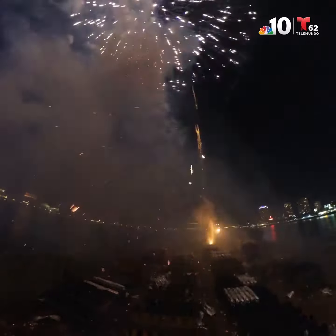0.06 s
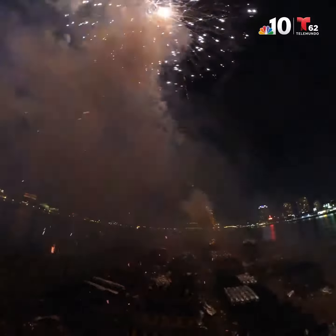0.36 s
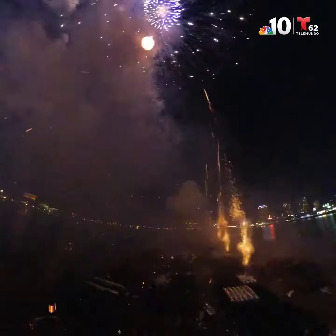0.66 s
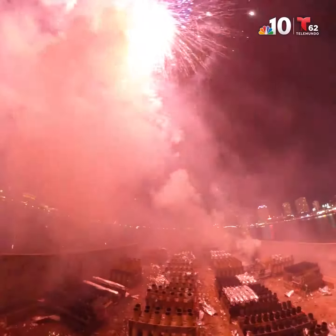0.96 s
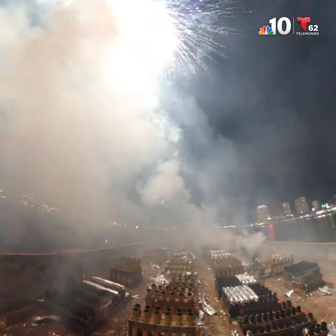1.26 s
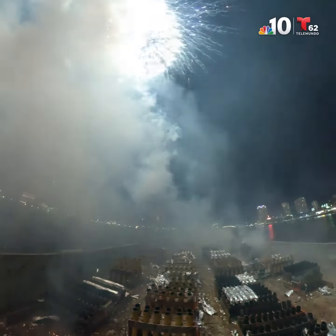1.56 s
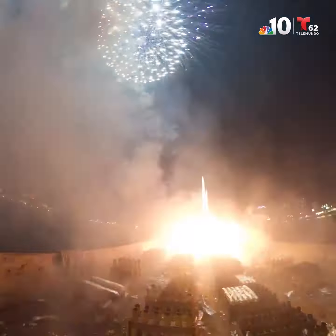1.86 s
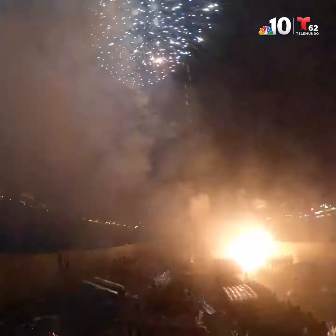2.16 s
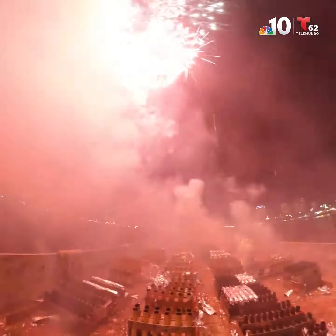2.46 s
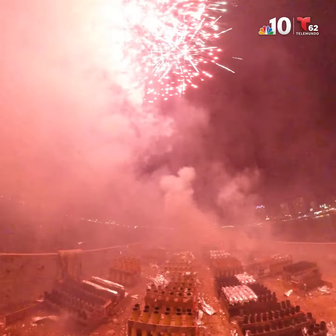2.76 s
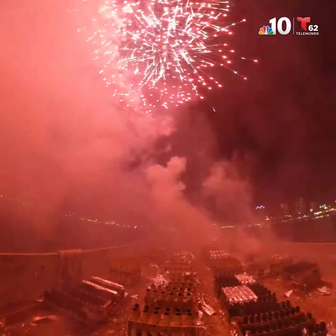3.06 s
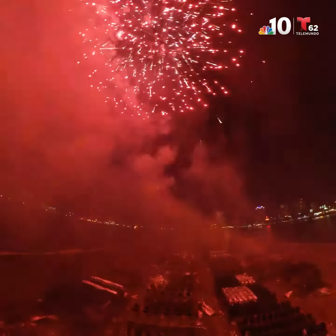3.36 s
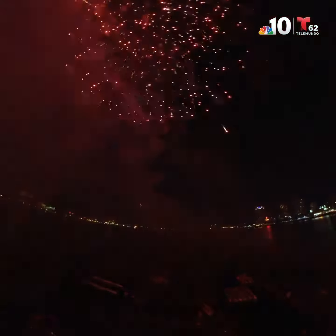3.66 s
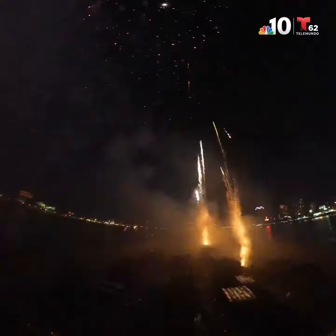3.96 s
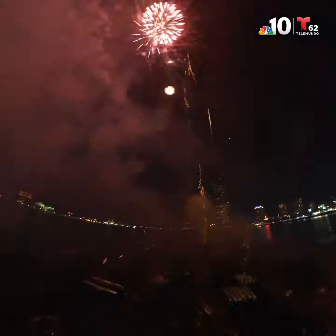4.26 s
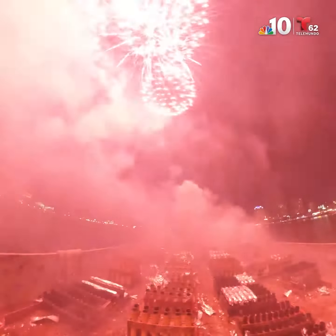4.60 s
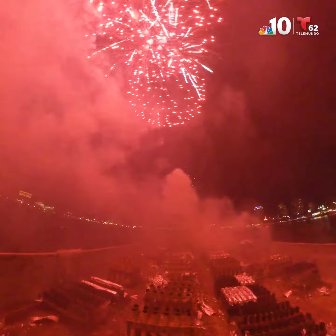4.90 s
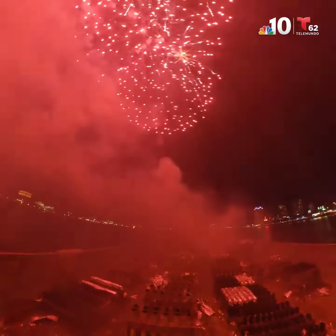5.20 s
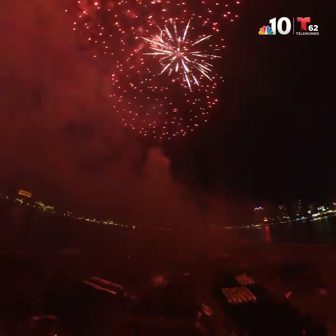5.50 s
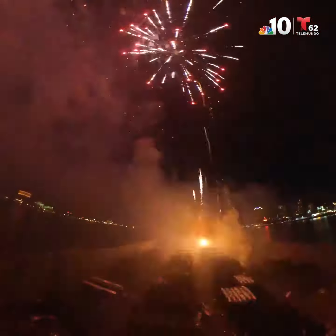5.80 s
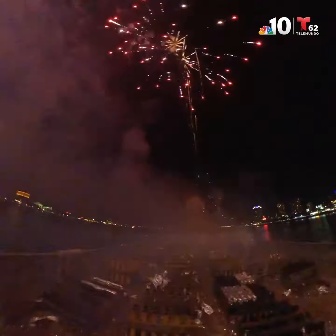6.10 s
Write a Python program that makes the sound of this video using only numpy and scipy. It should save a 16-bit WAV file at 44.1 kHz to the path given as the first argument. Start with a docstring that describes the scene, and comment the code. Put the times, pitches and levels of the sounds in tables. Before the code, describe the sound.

Heard close up from the deck of a barge, fireworks launch with short spitting whooshes, deep thumps and a rattle of tubes. Two launches lead to two sharp cracks overhead. More launches bring a fast string of bangs, then a further round ends in a second quick cluster. Each burst snaps back off the nearby racks and fades over the water, above a low distant rumble and faint sizzling.

```python
"""Firework mortars firing from racks on a barge, heard from the deck.
Each muzzle spits a turbulent jet; the lift charge then sends out a blast wave, the rack booms, a hollow
note sinks and the tube knocks and rings. Shells burst overhead as shocks that reflect off the deck and
scatter among the racks. Reverberation rolls away over the water while burning stars fizz."""
import sys
import numpy as np
from scipy import signal
from scipy.io import wavfile

SR = 44100
rng = np.random.default_rng(int(sys.argv[2]) if len(sys.argv) > 2 else 0)


def transcribe(u):
    """Save the signal u as a 16-bit wav file named by the first command-line argument.

    u: samples, shape (n,) or (channels, n), limited to [-1, 1]; the rate is SR.
    q: integer samples, one column per channel.
    """
    v = np.clip(np.atleast_2d(u).T, -1, 1)
    q = np.round(v * 32767).astype(np.int16)
    wavfile.write(sys.argv[1], SR, q)


N = 270774
TIME = np.arange(N) / SR
STEP = 16
TICKS = TIME[::STEP]   # the slower clock of all power curves
BANDS = np.geomspace(28, 11000, 24)   # centres, f/Hz
CUTOFF_HZ = 10600
TAIL_TOP_HZ = 9900   # upper edge of the booms, scatter and rolling tails

# Mortar launches (levels in all tables are relative): t/s, spit/dB, jet delay/s, jet/dB, jet length/s,
# jet body/dB, recoil/dB, lift delay/s, lift gust/dB, hiss/dB, boom/dB, boom length/s, knock/dB
LAUNCHES = [(0, -17.5, 0.017, -8, 0.028, 1.5, -32.5, 0.087, -24, -18, -20, 0.082, -4.5),
            (0.885, -11, 0.018, -15.5, 0.031, 10, -18, 0.074, -19, -29, -18, 0.061, -9),
            (2.444, -24, 0.013, -10.5, 0.029, -3.5, -51, 0.083, -8.5, -19.5, -20.5, 0.079, -2),
            (2.96, -20.5, 0.0029, -7.5, 0.0093, 14, -49, .006, -17, -23, -21, 0.053, -9.5),
            (3.087, -35, 0.002, -4, 0.0025, 7, -23, .0148, -7, -27, -23, .06, -6),
            (4.136, -30, 0.018, -12.5, 0.0038, 13, -20.5, .0615, -4, -28, -24, .06, -6.5),
            (4.976, -16.5, 0.02, -10.5, 0.03, 4.5, -48, 0.068, -9, -21.5, -19, 0.094, -2.5),
            (5.309, -18.5, 0.0055, -13, 0.0014, 4, -21.5, 0.0632, -6.5, -42, -26.5, .06, -8.5)]
# Stray sparks: t/s, level/dB, length/s, body/dB
SPARKS = [(1.312, -34.5, 0.0021, -13), (2.303, -47, 0.006, 30.5), (3.999, -43, 0.019, 7)]
# Hard reports that tear through a jet: t/s, level/dB
REPORTS = [(0.901, -8), (4.1424, -2.5), (5.008, -1.5)]
# Spectral density of a gas jet: f/Hz, level/dB
JET_SPECTRUM = [(40, -36), (110, -24), (700, -7), (1300, 2), (1900, -8.5), (3300, 0), (5200, -3),
                (6500, -1.5), (11000, -8)]
def jets(rise_s=0.001, fullness=1.48, spit_s=0.019, lift_s=0.0017, lift_body_db=8):
    """Jet noise, as band power: a muzzle spits, gas rushes out, and a short gust opens the lift."""
    gusts = [(s, db, length, body_db, rise_s) for s, db, length, body_db in SPARKS]
    gusts += [(s, db, lift_s, lift_body_db, rise_s) for s, db in REPORTS]
    for s, spit_db, delay, db, length, body_db, _, lift_delay, lift_db, *_ in LAUNCHES:
        gusts += [(s, spit_db, spit_s, body_db, rise_s),
                  (s + delay, db, length, body_db, 0.057 * length),   # a longer rush builds more slowly
                  (s + lift_delay, lift_db, lift_s, lift_body_db, rise_s)]
    body = at_bands([(704, 1), (2260, 0)])
    colours = np.array([from_db(db + body_db * body) ** 2 for _, db, _, body_db, _ in gusts])
    swells = np.array([swell(s, length, rise, fullness) for s, _, length, _, rise in gusts])
    return shares(JET_SPECTRUM) * (colours.T @ swells)


def crackle(power, per_s=220, level_db=10.5, spread_db=3.5):
    """Nonlinear steepening: the fastest gas forms tiny shocks, so the rush crackles."""
    strength = np.interp(TIME, TICKS, np.sqrt(power[BANDS > 1500].sum(axis=0)))
    shocks = (rng.random(N) < per_s / SR) * strength
    shocks *= from_db(level_db + spread_db * np.clip(rng.standard_normal(N), -2, 2))
    snap = shock(push_s=0.0002, crack_s=0.0001, crack_share=0.23, edge_hz=4500)
    snap = rack_reflections(snap, spread_s=0.0059, level_db=-14.5)
    return signal.oaconvolve(shocks[None], snap, axes=1)[:, :N]


# Interaural coherence of the jets: f/Hz, correlation
JET_COHERENCE = [(60, 0.83), (250, 0.47), (600, 1), (1400, 0.85), (3000, 0.26), (9000, .05)]
def muzzles(gas, roar, spurts, lag_s=0.000273, bass_hz=410):
    """Interaural delay: the crackling rush reaches the right ear late; the bass is alike in both."""
    rush = turbulence(gas * spurts, JET_COHERENCE, patchy_db=0.5, patch_rate=50)
    left, right = from_db(-1.5) * (rush + crackle(gas + roar))
    right = np.interp(TIME - lag_s, TIME, right)
    mid, side = (left + right) / 2, (left - right) / 2
    side = signal.sosfiltfilt(signal.butter(1, bass_hz, "high", fs=SR, output="sos"), side)
    return np.array([mid + side, mid - side])


# Single heavy thuds, near and far: t/s, level/dB, positive phase/s
THUDS = [(.0876, -6, 0.0038), (2.471, -7, 0.0019), (3.09, -6, 0.0017), (3.642, -8, .0008),
         (4.757, -17.5, 0.0011), (4.7935, -33, 0.0015), (4.903, -17.5, 0.0013)]
def thuds(near_hz=5500, dulling=0.43, lift_push_s=0.0011):
    """Rounded blast waves, one of which opens every lift; fainter ones have less treble."""
    lifts = [(s + delay, db - 1.5, lift_push_s) for s, *_, delay, db, _, _, _, _ in LAUNCHES]
    out = np.zeros((2, N))
    for s, db, push_s in THUDS + lifts:
        wave = shock(push_s, crack_s=0.00028, crack_share=0.79, edge_hz=650)
        wave = cut(wave, near_hz * from_db(db * dulling), "low")
        add(out, s, from_db(db) * rack_reflections(wave, spread_s=0.018, level_db=-5))
    return cut(out, 39, "high")


# Spectral density of a booming rack: f/Hz, level/dB
BOOM_SPECTRUM = [(25, -26), (60, -3.5), (120, 1), (350, -4), (700, -7.5), (1100, -6.5), (1700, -9),
                 (3000, -14), (5000, -22), (10000, -30)]
def booms(rise_s=0.0013, fullness=1.563, recoil_s=0.05, treble_db=3, treble_life=0.82, hiss_life=0.78):
    """Forced vibration, as band power: the rack recoils, then roars after the lift over hissing gas."""
    low, top, hiss = np.zeros((3, len(TICKS)))
    roars = []
    for s, *_, recoil_db, lift_delay, _, hiss_db, db, length, _ in LAUNCHES:
        roars += [(s, recoil_db, recoil_s), (s + lift_delay, db, 1.183 * length)]
        hiss += from_db(hiss_db) ** 2 * swell(s + lift_delay, length * hiss_life, rise_s, fullness)
    for s, db, length in roars:
        low += from_db(db) ** 2 * swell(s, length, rise_s, fullness)
        top += from_db(db + treble_db) ** 2 * swell(s, length * treble_life, rise_s, fullness)
    roar = shares(BOOM_SPECTRUM) * np.where(BANDS[:, None] < 1500, low, top)
    return roar + shares(JET_SPECTRUM) * hiss


def hollow_notes(start_hz=309, end_hz=103.6, sink_s=0.085, rise_s=0.051, fullness=2.13):
    """Resonance, as band power: after each lift a broad note and its overtone sink as the shell climbs away."""
    power = np.zeros((len(BANDS), len(TICKS)))
    # frequency ratio, level/dB, life/boom lengths, width in log frequency
    modes = [(1, -5.5, 1.75, 0.24), (4.1, -2, 1.16, 0.38)]
    for s, *_, lift_delay, _, _, db, length, _ in LAUNCHES:
        lift = s + lift_delay
        hz = end_hz + (start_hz - end_hz) * np.exp(-np.maximum(TICKS - lift, 0) / sink_s)
        for ratio, mode_db, life, width in modes:
            detuning = np.log(BANDS[:, None] / (hz * ratio)) / width
            peak = 1 / (1 + detuning ** 2) ** 2
            envelope = from_db(db + mode_db) ** 2 * swell(lift, length * life, rise_s, fullness)
            power += peak / peak.sum(axis=0) * envelope
    return power


# Interaural coherence of the booms: f/Hz, correlation (clipped in use)
BOOM_COHERENCE = [(250, 1), (500, 0.92), (900, 0.39), (1500, -1.02), (3000, 0.15), (9000, 0.59)]
def racks(roar):
    """Incoherent addition: roar and hollow notes sum in power and radiate as noise."""
    noise = turbulence(roar + hollow_notes(), BOOM_COHERENCE, patchy_db=1.5, patch_rate=45)
    return top_cut(noise, TAIL_TOP_HZ)


# Modes of a mortar tube: f/Hz, level/dB
TUBE_MODES = [(490, -3), (670, -1), (1030, -2.5)]
def tube_ring(size, t60_s=0.06):
    """Damped normal modes: a tube rings at frequencies inversely proportional to its size."""
    t = TIME[:SR // 10]
    modes = sum(from_db(db) * np.sin(2 * np.pi * hz / size * t) for hz, db in TUBE_MODES)
    return from_db(-10 - 60 * t / t60_s) * modes


def knocks(blow_delay_s=0.0033, rattle_s=0.009, rattle_db=-6, count=4):
    """Impact excitation: as each boom ends the tube strikes its rack, rattles and rings."""
    out = np.zeros((2, N))
    blow = shock(push_s=0.0016, crack_s=0.00062, crack_share=0.63, edge_hz=5600)
    blow = cut(blow, 5100, "low")
    for s, *_, lift_delay, _, _, _, length, db in LAUNCHES:
        knock = s + lift_delay + length
        add(out, knock, from_db(db) * tube_ring(size=np.exp(0.05 * rng.standard_normal())))
        rattle = [(rattle_s * (late - 0.25), rattle_db) for late in rng.random(count)]
        for delay, hit_db in [(blow_delay_s, 0)] + rattle:
            hit = rack_reflections(blow, spread_s=0.0091, level_db=-5.5)
            add(out, knock + delay, from_db(db + hit_db) * hit)
    return from_db(-5) * out


# Shell bursts overhead: t/s, shock/dB, scatter/dB, scatter treble/dB, thump/dB
BURSTS = [(1.396, -4.5, -20, -1.5, -8), (1.712, -4.5, -21.5, 1, -5), (3.224, -7.5, -21, -2, -37),
          (3.3453, -6, -23, -2.5, -20), (3.349, -5, -30, 8, -30), (3.384, -7, -22, -1, -14),
          (3.465, -5, -29, -9, -39), (3.506, -6, -23.5, -0.5, -46), (3.617, -3, -26, -6, -35),
          (3.641, -28, -22.5, -0.5, -43), (5.568, -4.5, -21, -2.5, -30), (5.748, -3, -20.5, -0.5, -8),
          (5.8069, -4.5, -25, 3.5, -17), (5.8353, -7, -22, 0.5, -32), (5.9092, -4, -26.5, 0, -25),
          (5.9647, -5, -23, 0.5, -13)]
def bursts(echo_s=0.0137, echo_db=1.54, thump_hz=72, thump_s=0.0039, level_db=1.0):
    """Shock and reflection: each shell's front and low thump arrive directly, then off the deck."""
    out, t = np.zeros((2, N)), TIME[:SR // 20]
    thump = np.sin(2 * np.pi * thump_hz * t) * np.exp(-t / thump_s)
    sizes = np.exp(0.047 * rng.standard_normal(len(BURSTS)))
    for (s, db, _, _, thump_db), size in zip(BURSTS, sizes):
        direct = shock(push_s=0.0015 * size, crack_s=0.00008, crack_share=0.96, edge_hz=1080)
        direct = rack_reflections(direct, spread_s=0.012, level_db=-13)
        slap = shock(push_s=0.00097 * size, crack_s=0.00038, crack_share=0.64, edge_hz=850)
        slap = rack_reflections(slap, spread_s=0.018, level_db=-16.5)
        for arrival, wave in [(s, direct), (s + echo_s, from_db(echo_db) * slap)]:
            add(out, arrival, from_db(db + level_db) * wave)
            add(out, arrival, from_db(thump_db) * thump)
    return cut(out, 61, "high")


def ricochets(level_db=12.5, first_s=0.014, spread_s=0.017, fade_db=6, skew_s=0.0003, count=4):
    """Discrete echoes: the nearest racks return each burst as hard snaps, each from its own side."""
    out = np.zeros((2, N))
    snap = shock(push_s=0.00025, crack_s=0.00012, crack_share=1.0, edge_hz=4800)
    for s, _, db, treble_db, _ in BURSTS:
        for late, side in rng.random((count, 2)):
            arrival = s + first_s + spread_s * late
            echo = from_db(db + treble_db + level_db - fade_db * late) * snap
            for ear, sign in zip(out, (1, -1)):
                add(ear, arrival + sign * skew_s * (side - 0.5), echo)
    return out


# Spectral density of a scattered shock: f/Hz, level/dB
SCATTER_SPECTRUM = [(30, -5), (80, -7), (180, -1.5), (380, -0.5), (1000, -5), (2000, -11), (4000, -15.5),
                    (10000, -18.5)]
def scatter(delay_s=0.00886, length_s=0.013, rise_s=0.00047, fullness=1.67, level_db=7.5, early_db=-13):
    """Diffuse scattering, as band power: a burst's shock breaks up among the rows of tubes."""
    low, top = np.zeros((2, len(TICKS)))
    for s, _, db, treble_db, _ in BURSTS:
        early = from_db(early_db) ** 2 * swell(s, length_s, rise_s, fullness)
        power = from_db(db + level_db) ** 2 * (early + swell(s + delay_s, length_s, rise_s, fullness))
        low += power
        top += power * from_db(treble_db) ** 2
    return shares(SCATTER_SPECTRUM) * np.where(BANDS[:, None] < 1500, low, top)


# Spectral density of the struck deck: f/Hz, level/dB
DECK_SPECTRUM = [(30, -14), (70, -10), (150, 1.5), (330, -4), (600, -2.5), (1500, -11.5), (10000, -42)]
def deck(level_db=-24, delay_s=0.013, rise_s=0.0032, length_s=0.091, fullness=4.0):
    """Impulsive excitation, as band power: the deck booms briefly under each burst's shock."""
    power = sum(from_db(db + level_db) ** 2 * swell(s + delay_s, length_s, rise_s, fullness)
                for s, db, *_ in BURSTS)
    return shares(DECK_SPECTRUM) * power


# Spectral densities of the reverberation of launches and of bursts: f/Hz, level/dB
LAUNCH_ROLL = [(30, -15), (100, -2.5), (300, -3), (800, -30.5), (2000, -28), (10000, -22)]
BURST_ROLL = [(30, -23), (90, -6.5), (300, -1.5), (800, -8), (1600, -12), (4000, -14.5), (10000, -23)]
# Reverberation time over the water: f/Hz, T60/s
ROLL_T60 = [(60, 5.1), (300, 0.98), (1000, 3.14), (3000, 1.08), (10000, 0.3)]
def roll(launch_power, burst_power, tumble_db=1.5, tumble_rate=45):
    """Reverberation, as band power: returns from water and shore decay, the treble soonest."""
    retained = from_db(-60 * STEP / (at_bands(ROLL_T60) * SR)) ** 2
    out = 0
    for power, spectrum, db in [(launch_power, LAUNCH_ROLL, -14.5), (burst_power, BURST_ROLL, -6.5)]:
        drive = power.sum(axis=0) + 1e-18
        tails = np.array([signal.lfilter([1 - r], [1, -r], drive) for r in retained])
        out += from_db(db) ** 2 * shares(spectrum) * tails
    return out * from_db(tumble_db * wander(tumble_rate)) ** 2


# Spectral density of the far rumble: f/Hz, level/dB
RUMBLE_SPECTRUM = [(25, -29), (50, -16), (90, -0.5), (300, 5), (700, -3), (1400, -10.5), (3000, -18),
                   (10000, -69)]
# Its course in time: t/s, level/dB
RUMBLE_LEVEL = [(0, -42), (1.4, -40.5), (1.9, -42), (2.4, -47.5), (2.8, -42.5), (4.5, -41.5), (4.8, -36),
                (5.5, -39)]
def rumble(lumpy_db=2.5, lump_rate=48):
    """Superposition, as band power: far echoes merge into a lumpy rumble."""
    db = np.interp(TICKS, *np.transpose(RUMBLE_LEVEL)) + lumpy_db * wander(lump_rate)
    return shares(RUMBLE_SPECTRUM) * from_db(db) ** 2


# Spectral density of burning stars: f/Hz, level/dB
FIZZ_SPECTRUM = [(30, -20), (800, -8.5), (2500, 0), (5000, 8), (10000, 3.5)]
def fizz(stars_db=-63.5, trail_db=-54, flicker_db=4.5, flicker_rate=40):
    """Combustion noise, as band power: stars fizz throughout, and each climbing shell adds a trail."""
    trails = sum(swell(s, length_s=0.7, rise_s=0.62, fullness=3) for s, *_ in LAUNCHES)
    power = from_db(stars_db) ** 2 + from_db(trail_db) ** 2 * trails
    return shares(FIZZ_SPECTRUM) * power * from_db(flicker_db * wander(flicker_rate)) ** 2


# Interaural coherence of the open air: f/Hz, correlation
AIR_COHERENCE = [(40, 1), (300, 1), (700, 0.84), (1400, 0.049), (3000, 0.098), (9000, 0.44)]
def open_air(power):
    """A diffuse field: the bass is alike at both ears, the treble largely independent."""
    air = turbulence(power, AIR_COHERENCE, patchy_db=1.78, patch_rate=19)
    return top_cut(shifting_paths(air, above_hz=1170, spread_s=0.0059, depth=0.62), TAIL_TOP_HZ)


def shock(push_s, crack_s, crack_share, edge_hz):
    """Blast wave: a thin crack leads a steep suction and a longer, weaker rise of pressure."""
    t = TIME[:SR // 20]
    blast = (t / push_s - 1) * np.exp(-t / push_s)
    wave = crack_share * np.exp(-2 * t / crack_s)
    add(wave, crack_s, cut(blast, edge_hz, "low"))
    return wave


def rack_reflections(wave, spread_s, level_db, count=14):
    """Early reflections: the racks add short echoes to a wave, their treble different at each ear."""
    paths = np.zeros((2, SR // 20))
    for ear in paths:
        delay = rng.random(count) ** 2
        taps = (delay * spread_s * SR).astype(int) + 1
        ear[taps] = from_db(level_db) * rng.standard_normal(count) * np.exp(-2 * delay)
    paths = cut(paths, 620, "high", order=1)
    paths[:, 0] += 1   # the direct path
    return signal.fftconvolve(paths, wave[None])


def shifting_paths(x, above_hz, spread_s, depth, count=90):
    """Multipath interference: reflections through hot, moving gas comb the treble ever differently."""
    out, hop = np.zeros((2, N)), N // count
    window = 1 - np.abs(np.arange(-hop, hop)) / hop
    for start in hop * np.arange(-1, count + 1):
        piece = x[:, max(start, 0):start + 2 * hop]
        piece = piece * window[max(-start, 0):][:piece.shape[1]]
        path = rng.standard_normal(SR // 100) * np.exp(-TIME[:SR // 100] / spread_s)
        path *= depth / np.linalg.norm(path)
        path[0] += np.sqrt(1 - depth ** 2) - 1   # the direct treble loses what the echoes carry
        path = cut(path, above_hz, "high", order=1)
        path[0] += 1
        add(out, start / SR, signal.fftconvolve(piece, path[None]))
    return out


def turbulence(power, coherence, patchy_db, patch_rate):
    """Random pressure: stereo noise follows each band's power, its colour shifting as gas billows."""
    out, half_step = np.zeros((2, N)), np.sqrt(BANDS[1] / BANDS[0])
    white = rng.standard_normal((2, 2, N))
    for k, (hz, alike) in enumerate(zip(BANDS, np.clip(at_bands(coherence), -0.99, 0.995))):
        noise = cut(white[k % 2], [hz / half_step, hz * half_step], "band")
        gain = np.sqrt(power[k]) * from_db(patchy_db * wander(patch_rate)) / noise[0, ::STEP].std()
        mid_side = np.sqrt([[(1 + alike) / 2], [(1 - alike) / 2]])
        out += noise * np.repeat(mid_side * gain, STEP, axis=1)[:, :N]
    mid, side = out
    return np.array([mid + side, mid - side])


def swell(s, length_s, rise_s, fullness):
    """Growth and decay of power from time s; more fullness holds longer and falls faster."""
    t = np.maximum(TICKS - s, 0)
    return (1 - np.exp(-t / rise_s)) ** 2 * np.exp(-np.minimum((t / length_s) ** fullness, 60))


def wander(rate):
    """Random modulation with a spread near 1, through `rate` values a second."""
    knots = rng.standard_normal(len(TICKS))
    return np.interp(TICKS * rate, np.arange(len(knots)), knots)


def from_db(db):
    """Level to amplitude ratio."""
    return 10 ** (np.asarray(db) / 20)


def at_bands(points):
    """Interpolation in log frequency at the band centres."""
    hz, value = np.transpose(points)
    return np.interp(np.log(BANDS), np.log(hz), value)


def shares(spectrum):
    """Density times bandwidth: each band's share of the power, as a column."""
    power = from_db(at_bands(spectrum)) ** 2 * BANDS
    return (power / power.sum())[:, None]


def cut(x, hz, kind, order=2):
    """Maximally flat filter."""
    return signal.sosfilt(signal.butter(order, hz, kind, fs=SR, output="sos"), x + 1e-18)


def top_cut(x, hz=CUTOFF_HZ):
    """Linear-phase low-pass, which keeps fronts sharp."""
    kernel = signal.firwin(151, hz, fs=SR, window=("kaiser", 7))
    return signal.oaconvolve(x, kernel[None], "same", axes=1)


def add(track, s, piece):
    """Superpose a piece on a track at time s."""
    start = max(round(s * SR), 0)
    room = track[..., start:start + piece.shape[-1]]
    room += piece[..., :room.shape[-1]]


def scene(sputter_db=2.5, sputter_rate=520, surge_db=2.0, surge_rate=130):
    """Linear superposition of launches, bursts and their long roll over the water."""
    gas, roar, clatter = jets(), booms(), scatter()
    tails = roll(gas + roar, clatter)
    # the gas leaves in spurts and slower surges, which roughen all but the bass
    rough_db = sputter_db * wander(sputter_rate) + surge_db * wander(surge_rate)
    spurts = from_db(rough_db * np.minimum(BANDS[:, None] / 900, 1)) ** 2
    mortars = muzzles(gas, roar, spurts) + racks(roar * spurts)
    near = shifting_paths(mortars, above_hz=1450, spread_s=0.0042, depth=0.5)
    far = open_air(clatter * spurts + deck() + tails + rumble() + fizz())
    return near + far + bursts() + ricochets() + thuds() + knocks()


def record(dry, limit_db=-1, recovery_db_per_s=1800):
    """Peak limiting: the gain ducks under the loudest fronts and recovers fast; the top is cut."""
    heard = top_cut(dry)
    peak_db = 20 * np.log10(np.abs(heard).max(axis=0) + 1e-9)
    over_db = np.maximum(peak_db - limit_db, 0)
    recovery_db = recovery_db_per_s * TIME
    duck_db = np.maximum.accumulate(over_db + recovery_db) - recovery_db
    return top_cut(heard * from_db(-duck_db))


dry = scene()
out = record(dry)
transcribe(out)
```